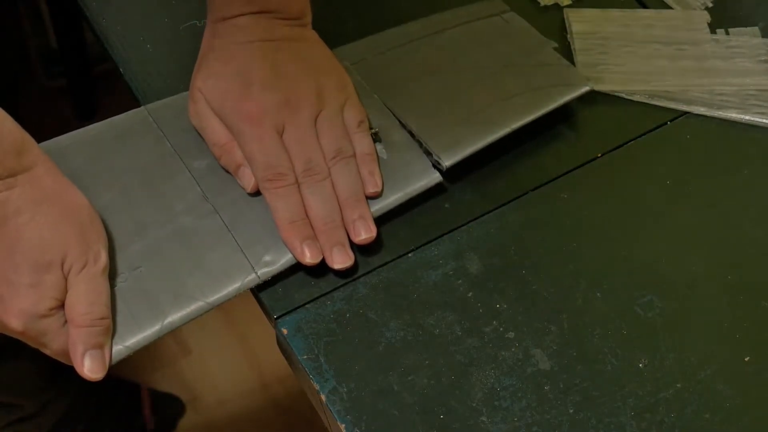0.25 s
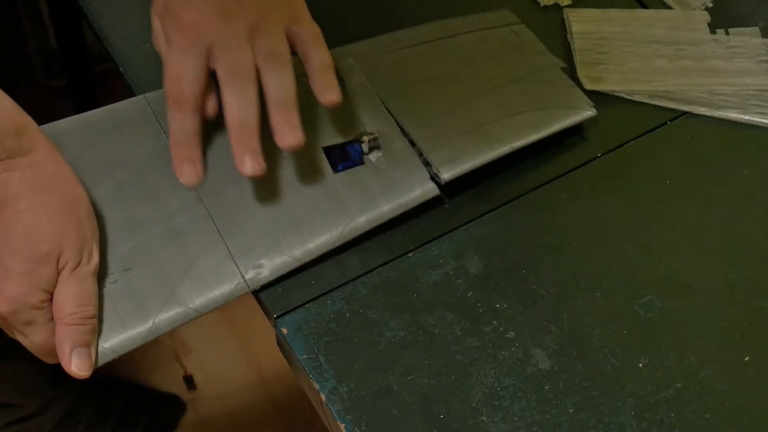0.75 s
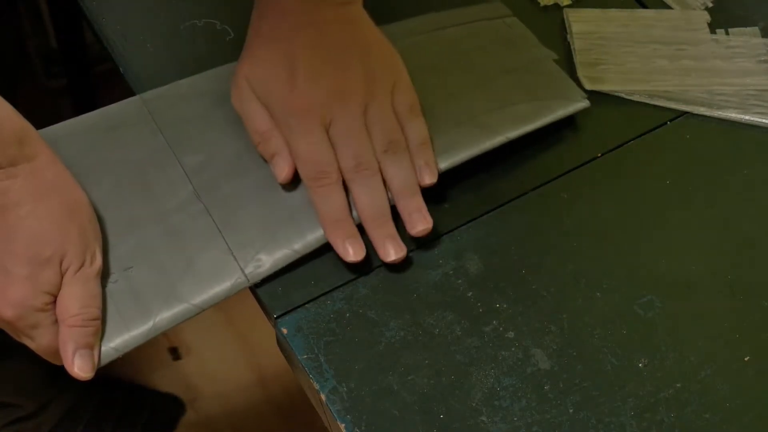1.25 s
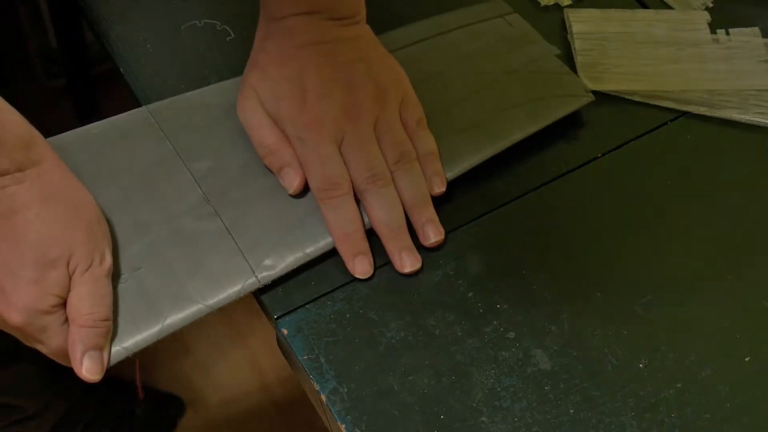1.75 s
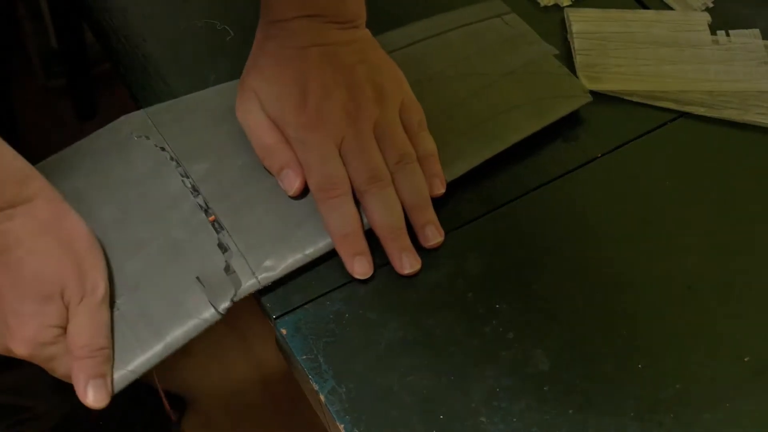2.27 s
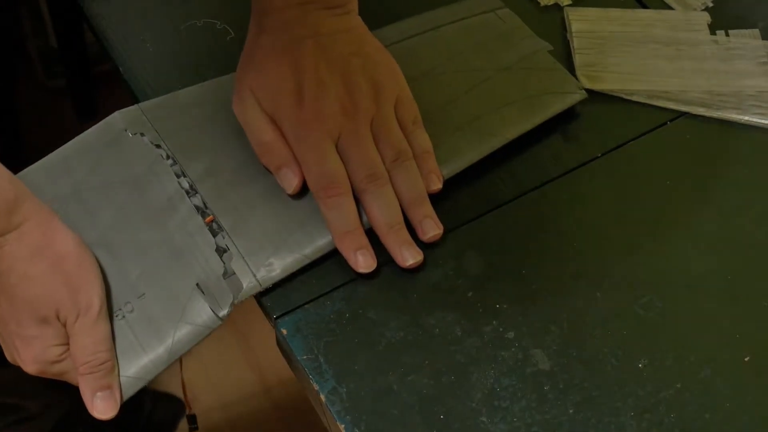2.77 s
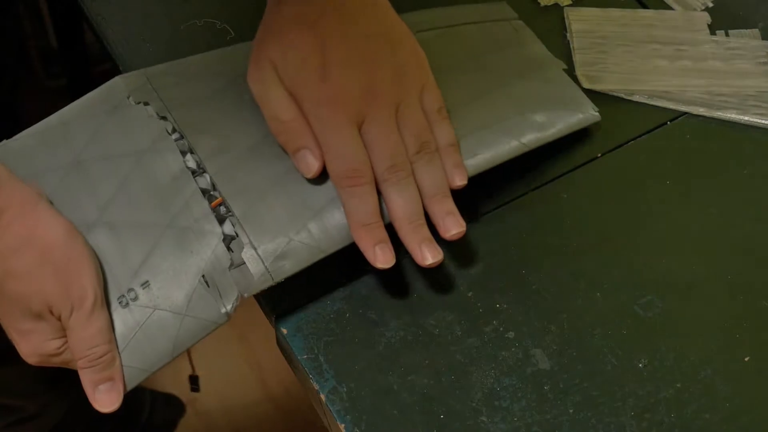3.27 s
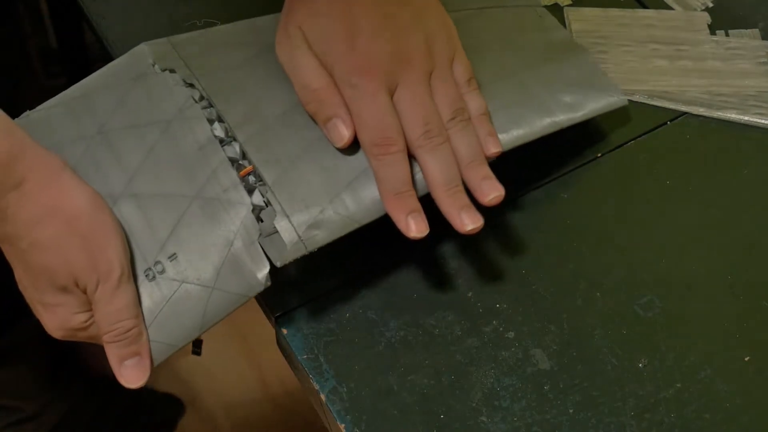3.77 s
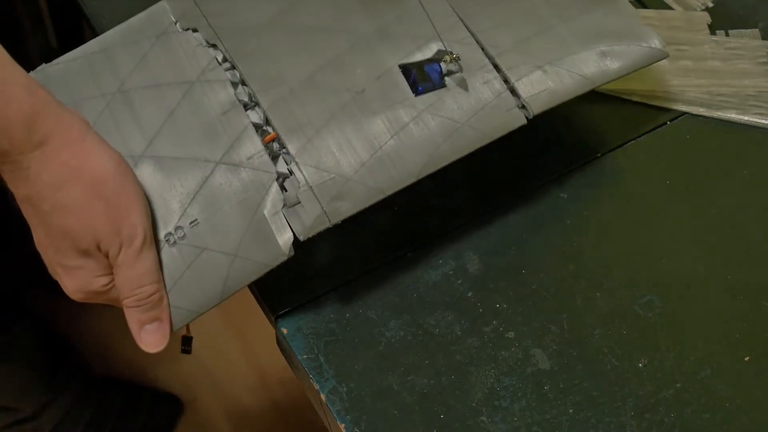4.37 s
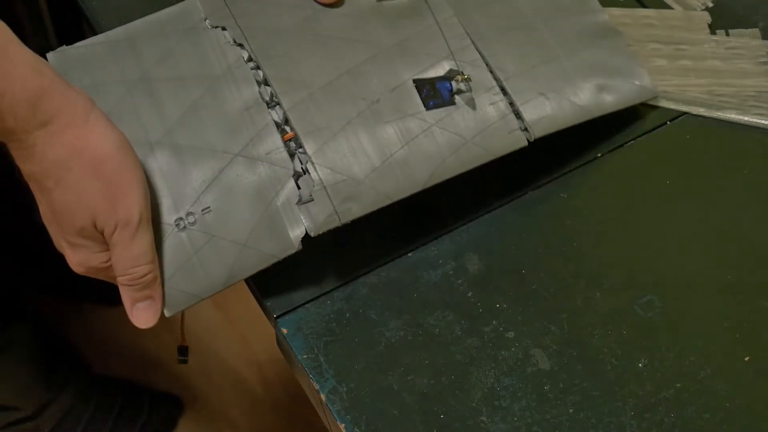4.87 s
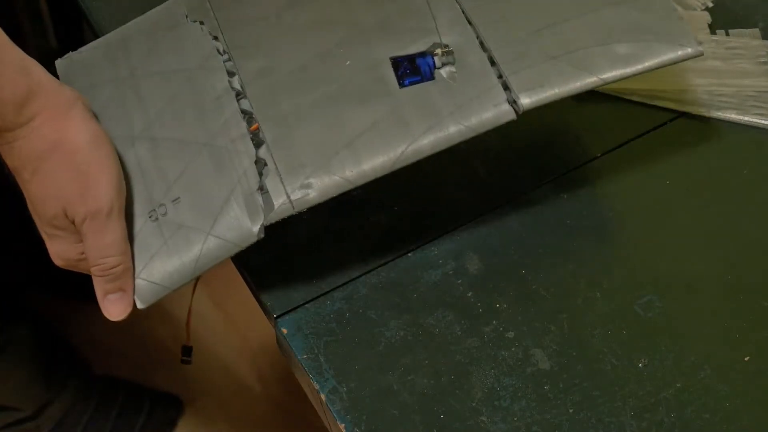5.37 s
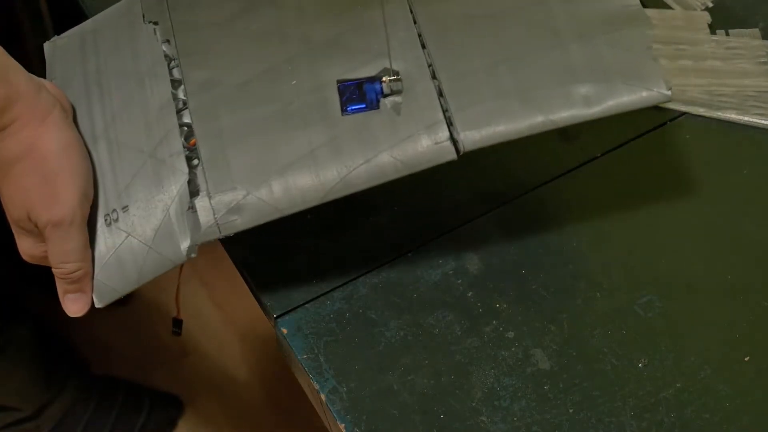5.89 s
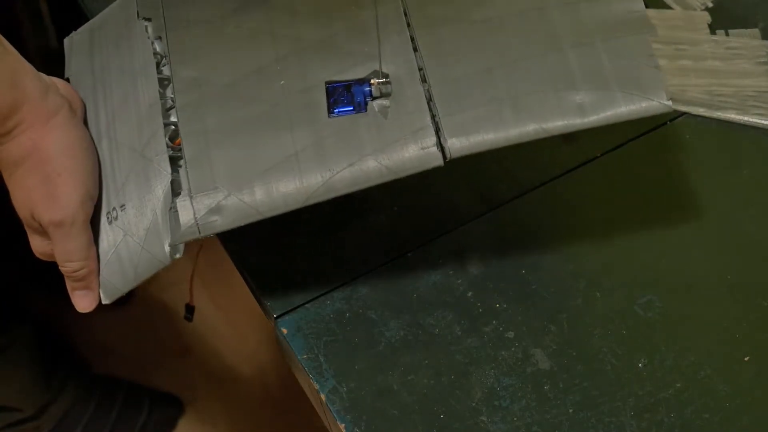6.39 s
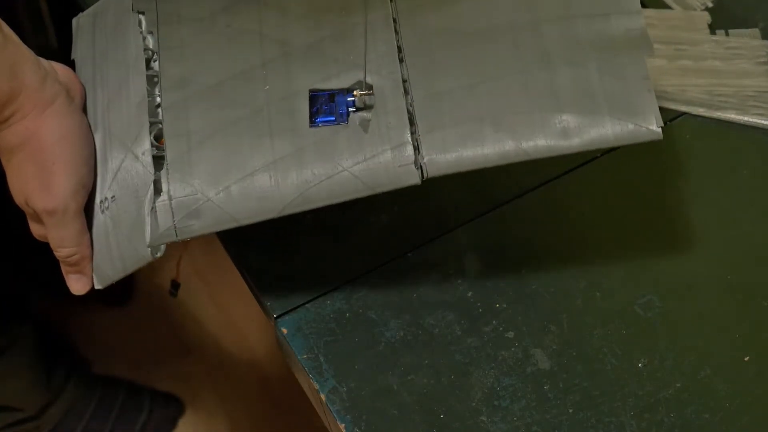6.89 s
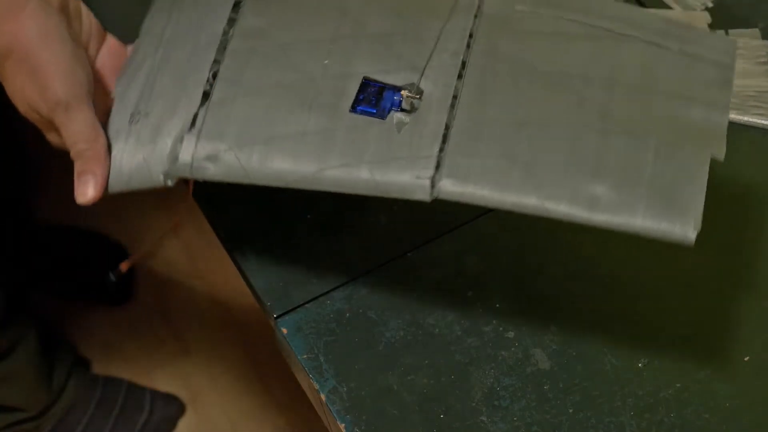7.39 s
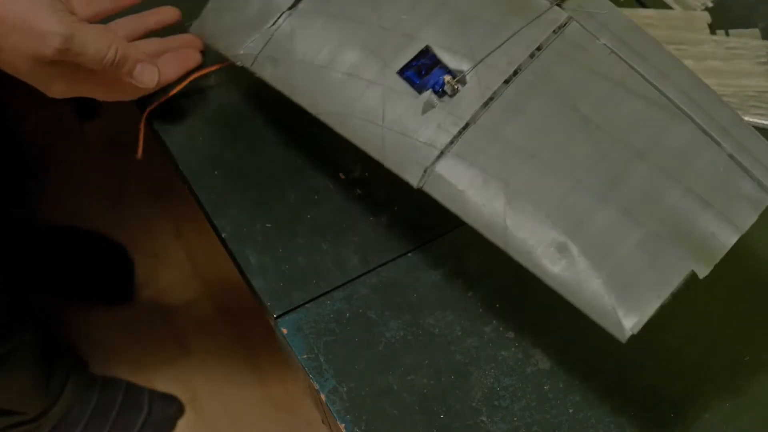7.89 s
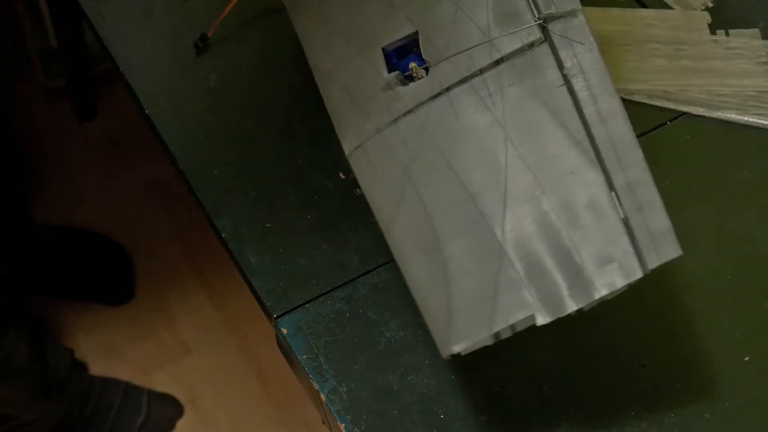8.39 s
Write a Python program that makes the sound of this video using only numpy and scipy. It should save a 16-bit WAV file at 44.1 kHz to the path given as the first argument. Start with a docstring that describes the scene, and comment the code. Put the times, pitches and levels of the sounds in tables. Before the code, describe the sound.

Irregular sharp cracks and splintering crunches of a hollow plastic shell being broken by hand over a workbench, with light rustling between.

```python
"""Cracking a plastic shell

Hands bend a thin, brittle plastic shell over the edge of a workbench until it cracks, then work the
break to and fro. Each fracture radiates a snap and excites the modes of the hollow shell, amid short
pings and rustling tails. Stick-slip friction makes the skin rub and the torn edges squeak once, and
pushes set the bench top thudding. A small hard room reverberates over its own steady hum."""
import sys
import numpy as np
from scipy import signal
from scipy.fft import rfft, irfft
from scipy.io import wavfile
from scipy.ndimage import uniform_filter1d

SR = 44100
rng = np.random.default_rng(int(sys.argv[2]) if len(sys.argv) > 2 else 0)


def to_wav(sig):
    """Store sig (one row per channel, or 1-D mono) as 16-bit WAV at the path in sys.argv[1].

    Samples outside -1..1 are clipped; the rate is SR.
    """
    pcm = np.clip(np.atleast_2d(sig), -1, 1) * 32767
    pcm = np.round(pcm).astype(np.int16)
    wavfile.write(sys.argv[1], SR, pcm.T)  # frames by channels


N = 381465

# Spectrum of the room's hum and hiss: frequency_hz, density_db
HUM_SPECTRUM = [(15, -34), (25, -33), (87, -11), (120, -5.5), (279, -4.5), (347, -4), (455, -10), (494, -5),
                (535, -8.5), (741, -7), (804, -8.5), (2020, -16.5), (6310, -20.5), (14600, -23.5),
                (16300, -25)]
# Reverberation time of the room: frequency_hz, t60_s
ROOM_DECAY = [(150, 0.57), (500, 0.19), (1500, 0.34), (4000, 0.072), (9000, 0.14), (15000, 0.13)]
# Modes of the bench top: frequency_hz, level_db, t60_s
BENCH_MODES = [(64, -6, .55), (120, -6, .4), (200, -9, .25), (260, -8, .38), (318, -8, .13), (377, 1, .19),
               (440, -6, .08)]
# Pushes on the bench (a heavy palm shakes the whole top): start_s, level_db, push_ms, deep_modes_db
BENCH_PUSHES = [(0.546, -54, 2.2, -11), (1.264, -35, 8.6, -0.5), (1.498, -49, 5.7, -11),
                (2.185, -51, 13, -10), (2.6, -50.5, 4.3, -12), (2.644, -40, 5.6, -12),
                (4.905, -51.5, 15, -9)]
# Spectrum of friction on the shell's skin: frequency_hz, density_db
SKIN_SPECTRUM = [(71, -52), (120, -40), (204, -3.5), (341, -9), (630, -0.5), (3450, -4), (9990, -6),
                 (14700, -11), (16000, -20)]
# Swells of rubbing noise and rustling tails after cracks; swell and fade span 20 dB:
# peak_s, level_db, swell_s, fade_s, treble_db
RUSTLE_SWELLS = [(0, -49, .1, 0.3, -26), (0.249, -44.5, 0.013, 0.08, -4), (.428, -47.5, .05, 0.11, -5),
                 (.545, -45, 0.027, 0.74, -8), (.866, -38, 0.26, 0.25, -6.5), (2.45, -41, 0.15, 0.3, -28),
                 (2.649, -43, 0.0072, 0.11, 3), (3.339, -38.5, 0.61, 0.27, -17),
                 (4.504, -52.5, 0.025, 1, -6.5), (5.301, -42, 0.021, 0.61, -20),
                 (5.697, -46, 0.074, 0.016, -26), (7.6, -51, 0.056, 0.85, -17), (7.96, -54, 0.49, 0.77, -9),
                 (8.204, -48, 0.044, 0.2, -2), (8.362, -61.5, 0.017, 0.075, 14)]
# Course of the slip between the torn edges: time_s, level_db, pitch_hz, upper_level_db
SQUEAK_COURSE = [(5.33, -48, 3550, -41), (5.375, -33, 3560, -35.5), (5.396, -16.5, 3587, -32),
                 (5.418, -22.5, 3636, -29), (5.429, -26, 3645, -28.5), (5.437, -16, 3673, -31),
                 (5.45, -20.5, 3730, -30), (5.5, -27, 3565, -37), (5.517, -23, 3564, -41),
                 (5.56, -35.5, 3550, -49), (5.635, -48, 3555, -62), (5.65, -44, 3560, -63),
                 (5.7, -54, 3560, -74)]
# Modes of the slipping edges: pitch_ratio, width_hz, level_db, is_upper
EDGE_MODES = [(1, 240, -4, 0), (1.01, 900, -12, 0), (.86, 500, -8, 1), (1.12, 300, -13, 1),
              (1.64, 320, -1, 1), (1.47, 400, -12, 1), (1.85, 400, -22, 0), (2.01, 320, -16, 0),
              (2.62, 700, -16, 1), (3.0, 1200, -22, 1), (3.95, 400, -27, 1)]
# Short pitched resonances (pings, snaps, shell rings and one low bump):
# start_s, pitch_hz, level_db, t60_s, quality_factor
SHORT_RESONANCES = [(0.208, 155, -43, .25, 2.5), (.686, 2050, -30, 0.074, 6.9), (.955, 627, -35, 0.28, 20),
                    (1.15, 690, -27.5, 0.37, 6.5), (1.149, 1290, -29, 0.18, 8.9),
                    (1.15, 4320, -36, 0.22, 12), (1.15, 5710, -43, 0.25, 17),
                    (1.2215, 6500, -17.5, .012, 1.9), (1.22, 7030, -23, 0.25, 5.7),
                    (1.467, 3960, -26, 0.13, 0.99), (2.1728, 2910, -15, 0.066, 1.4),
                    (2.61, 7360, -29.5, 0.2, 10), (2.649, 627, -23, 0.05, 2), (2.649, 2190, -30, 0.22, 7.5),
                    (2.649, 3200, -38.5, 0.19, 7), (2.891, 2080, -16, 0.11, 2.3),
                    (2.891, 3440, -26, 0.23, 3.7), (2.893, 4560, -29.5, 0.29, 8.6),
                    (3.269, 3450, -41.5, .4, 4.6), (3.25, 930, -37.5, 0.27, 12),
                    (3.458, 740, -16.5, 0.12, 3.2), (3.458, 1260, -32.5, 0.86, 6),
                    (3.6, 770, -39, 0.79, 6.4), (4.042, 2070, -34, 0.1, 4.1), (4.5, 803, -44, 0.46, 5.5),
                    (5.113, 786, -14.5, 0.037, 2.7), (5.13, 774, -40, 2.3, 9),
                    (5.114, 1100, -27.5, 0.58, 5.2), (5.115, 3320, -30, 0.7, 13),
                    (5.701, 2180, -26, 0.16, 2), (6.456, 1626, -35, 0.13, 12), (7.015, 1467, -30, 0.14, 26),
                    (7.015, 1630, -41, .5, 15), (7.113, 1256, -33, 0.23, 26), (7.112, 2260, -33, 0.15, 14),
                    (7.277, 2140, -21.5, 0.23, 5.5), (7.452, 2360, -29, 0.24, 3.3),
                    (7.475, 9800, -37, 0.37, 8.3), (7.518, 2670, -31, 0.32, 1.9)]
# Modes of the hollow shell: frequency_hz, width_hz, level_db
SHELL_MODES = [(772, 45, 1.5), (1253, 42, 0), (1465, 50, -8), (1865, 45, 1), (2298, 60, -9), (2440, 60, -9),
               (3000, 60, 0)]
# Cracks in the shell: start_s, level_db, bass_db, treble_db, splinter_t60_s, ring_db
SHELL_CRACKS = [(0.2467, -40.5, -36, -3, 0.59, -10), (0.391, -54, 2.5, -10, .42, -15),
                (0.4286, -56.5, 7.5, -5, 0.63, -25), (0.5405, -51, 15.5, -20, 0.97, 14),
                (0.6191, -40.5, 0.5, -12, 0.74, -4), (0.6854, -39.5, -24, 1.5, 0.72, -20),
                (1.0398, -47, 1.5, -20, 0.23, 0), (1.1488, -35.5, 4, -13.5, 0.5, -34),
                (1.2198, -33, -40, 12.5, 0.9, -20), (1.263, -36.5, 3.5, -19, 0.99, -23),
                (1.381, -45, -26, 9, .63, -17), (1.4115, -30, -14.5, 0.5, 1, -30),
                (1.4803, -12.5, -6.5, -8.5, 0.73, -3), (1.8315, -47, -18, 12.5, 0.53, -22),
                (2.177, -18, -18, 13, 0.95, 2.5), (2.183, -9, -4.5, -22, 1, -40),
                (2.572, -60, 20, -17, 0.73, -14), (2.608, -46.5, -16, 12, 1, -28),
                (2.6498, -40, 11, -36, 0.71, -33), (2.793, -46.5, -33, 17, 1, -20),
                (2.891, -22, -8, -10.5, 0.64, -10), (3.1034, -28, -19.5, 0.5, 0.46, -28),
                (3.457, -10.5, -16, 1, 1, -9), (3.7379, -42.5, -14.5, 9.5, 0.73, 0),
                (4.0426, -46.5, -3.5, -8.5, 0.61, -10), (4.4924, -66, 3, -7, 1, 24),
                (4.7028, -29.5, -17.5, 10, 0.56, -31), (4.8963, -41.5, 7.5, -11, 0.58, -20),
                (4.912, -38.5, 5, -7.5, 0.56, -22), (4.9498, -34.5, -15, -12, 0.52, -9),
                (5.1123, -12.5, -23, 6, 0.84, -6), (5.7002, -42.5, -11, 0, 0.81, 2.5),
                (6.15, -42.5, -26, 9, 0.55, -6), (6.4534, -34.5, -45, 8, 0.53, 0.5),
                (6.8404, -18.5, -13, -10.5, 0.55, 8), (7.014, -32.5, -4.5, -12, 0.51, 4.5),
                (7.0909, -36, -15, -14, 0.54, 4.5), (7.112, -32.5, -9, -6.5, 0.67, 2.5),
                (7.255, -32, -29, -9, 0.62, -3), (7.2759, -12, -26.5, 1.5, 0.79, -4.5),
                (7.451, -35, -5, -13, 0.8, -8), (7.4735, -31.5, -14, 0, 0.42, -22),
                (7.519, -30, -48, 3, 0.58, -9), (7.559, -35.5, -13, 0, 0.38, -10),
                (7.934, -62.5, -13, 18, 0.33, -2), (8.204, -48, -17, -8, 1, -22),
                (8.351, -43, -43, 13.5, 0.58, -12)]
# Frequency bands of a crack: low_hz, high_hz
CRACK_BANDS = [(2000, 5000), (250, 700), (700, 2000), (5000, 9000), (9000, 15000)]
# How each band follows a crack's colour: offset_db, bass_share, treble_share
CRACK_BAND_COLOUR = [(0, 0.017, 0), (-2.5, 1.235, 0.053), (6.5, 0.72, 0.37), (-0.6, 0.15, 0.59),
                     (6.5, 0.35, 0.83)]
# Splintering time of each band relative to that of the crack: t60_ratio
CRACK_BAND_DECAY = [0.72, 0.81, 0.72, 0.76, 0.31]


def undb(db):
    """Amplitude ratio of a level in decibels."""
    return 10 ** (np.asarray(db) / 20)


def unit(x):
    """Normalisation to an rms of one."""
    return x / np.sqrt(np.mean(x ** 2))


def decay(t, t60_s):
    """Exponential damping by 60 dB in t60_s."""
    return 1000. ** (-t / t60_s)


def band(x, low_hz, high_hz):
    """Causal Butterworth band-pass."""
    sos = signal.butter(2, [low_hz, min(high_hz, .45 * SR)], "band", fs=SR, output="sos")
    return signal.sosfilt(sos, x)


def resonate(x, hz, width_hz):
    """Forced response of one damped resonator."""
    return signal.lfilter(*signal.iirpeak(hz, hz / width_hz, SR), x)


def coloured(x, spectrum):
    """Spectral shaping by a curve of levels over log frequency."""
    hz, db = np.transpose(spectrum)
    bins_hz = np.maximum(np.arange(N // 2 + 1) * SR / N, 1)
    return irfft(rfft(x) * undb(np.interp(np.log(bins_hz), np.log(hz), db)), N)


def waver(rate_hz):
    """Smooth random fluctuation: values held for 1 / rate_hz and averaged twice."""
    hold = int(SR / rate_hz)
    steps = np.repeat(rng.standard_normal(N // hold + 1), hold)
    return uniform_filter1d(uniform_filter1d(steps, hold), hold)[:N]


def grains(size, max_db):
    """Granular noise: Gaussian samples with exponentially distributed boosts in level."""
    return rng.standard_normal(size) * undb(np.minimum(3 * rng.exponential(size=size), max_db))


def stereo(mid, side, side_db):
    """Left and right as the sum and difference of mid and side."""
    return mid + undb(side_db) * side * np.array([[1], [-1]])


def room_hum(level_db=-52.5):
    """Background noise: hum and hiss of fixed spectrum, wavering slightly in level."""
    mid, side = (unit(coloured(rng.standard_normal(N), HUM_SPECTRUM)) for _ in range(2))
    return undb(level_db + 0.5 * waver(1)) * stereo(mid, side, side_db=-3.5)


def reverberation(x, level_db=-9, build_up_s=0.0025):
    """Diffuse field: dense reflections build up, then decay at their own rate in each half octave."""
    t = np.arange(SR) / SR
    hz, t60_s = np.transpose(ROOM_DECAY)
    tail = np.zeros((2, SR))
    for low_hz in 60 * 2 ** np.arange(0, 8.5, .5):
        fade = decay(t, np.interp(np.log(low_hz), np.log(hz), t60_s))
        tail += band(rng.standard_normal((2, SR)), low_hz, low_hz * np.sqrt(2)) * fade
    tail *= (1 - np.exp(-t / build_up_s)) / np.sqrt(np.sum(tail[0] ** 2))
    mid, side = signal.fftconvolve(tail, x[None])[:, :N]
    side = side + band(side, 8900, 14800)  # the treble arrives more from the sides
    return undb(level_db) * stereo(mid, side, side_db=-4.5)


def bench_thuds(spread_db=2.2, deep_below_hz=180):
    """Modal response: a soft push of hand or shell is convolved with the bench top's damped modes."""
    t = np.arange(SR) / SR
    out = np.zeros(N + 2 * SR)
    for start_s, level_db, push_ms, deep_db in BENCH_PUSHES:
        shares = undb(spread_db * rng.standard_normal(len(BENCH_MODES)))
        ring = 0
        for share, (hz, mode_db, t60_s) in zip(shares, BENCH_MODES):
            gain = share * undb(mode_db + deep_db * (hz < deep_below_hz))
            ring += gain * np.sin(2 * np.pi * hz * t) * decay(t, t60_s)
        # the palm lands unevenly: a rough press that swells and eases off
        progress = t[:2048] * 1000 / min(push_ms, 12)
        push = band(rng.standard_normal(len(progress)), 77, 860) * progress * np.exp(-progress)
        thud = signal.fftconvolve(ring, push / np.sqrt(np.sum(push ** 2)))
        start = int(start_s * SR)
        out[start:start + len(thud)] += undb(level_db) * thud
    return out[:N]


def rub_and_rustle(ring_db=-25):
    """Stick-slip grains swell and fade as rubs or crack tails, and ring the lowest shell mode."""
    t = np.arange(N) / SR
    friction = undb(3 * waver(90)) * grains(N, max_db=12)
    skin = coloured(friction, SKIN_SPECTRUM)
    skin /= np.std(band(skin, 700, 3000))
    treble = signal.sosfilt(signal.butter(1, 3000, "high", fs=SR, output="sos"), skin)
    body_power = treble_power = 0
    for peak_s, level_db, swell_s, fade_s, treble_db in RUSTLE_SWELLS:
        envelope = undb(level_db - 20 * np.maximum((peak_s - t) / swell_s, (t - peak_s) / fade_s))
        body_power += envelope ** 2
        treble_power += (undb(treble_db) * envelope) ** 2
    hz, width_hz, _ = SHELL_MODES[0]
    body = skin - treble + undb(ring_db) * unit(resonate(friction, hz, width_hz))
    return np.sqrt(body_power) * body + np.sqrt(treble_power) * treble


def edge_squeak(tone_db=-4.5, pitch_waver=.004):
    """Friction oscillation: edges slip in jerks; a clear tone and rough modes follow the tension."""
    times_s, *columns = np.transpose(SQUEAK_COURSE)
    start, end = int(times_s[0] * SR), int(times_s[-1] * SR)
    t = np.arange(start, end) / SR
    level_db, pitch_hz, upper_db = (np.interp(t, times_s, column) for column in columns)
    phase = 2 * np.pi * np.cumsum(pitch_hz * (1 + pitch_waver * waver(60)[start:end])) / SR
    sound = undb(tone_db + level_db) * np.sqrt(2) * np.sin(phase)
    for ratio, width_hz, mode_db, is_upper in EDGE_MODES:
        lowpass = signal.butter(2, width_hz / 2, fs=SR, output="sos")
        wobble = signal.sosfilt(lowpass, rng.standard_normal(len(t)) + 1j * rng.standard_normal(len(t)))
        mode = unit((wobble * np.exp(1j * ratio * phase)).real)  # a narrow band of noise
        sound += undb(mode_db + (upper_db if is_upper else level_db)) * mode
    jerks = undb(2.2 * waver(130)[start:end])
    return np.pad(sound * jerks, (start, N - end))


def short_resonances(rise_s=0.000172):
    """Damped resonance: noise filtered about one frequency sets in sharply and dies away."""
    t = np.arange(SR * 2 // 3) / SR
    out = np.zeros(N + len(t))
    for start_s, hz, level_db, t60_s, quality in SHORT_RESONANCES:
        width_hz = hz / np.clip(quality, 1.5, 24)
        noise = rng.standard_normal(len(t))
        ring = unit(resonate(resonate(noise, hz, width_hz), hz, width_hz))
        envelope = (1 - np.exp(-t / rise_s)) * decay(t, t60_s)
        start = int(start_s * SR)
        out[start:start + len(t)] += undb(level_db) * ring * envelope
    return out[:N]


def shell_ring(force, spread_db=2.2):
    """Modal coupling: each crack lies somewhere else, so it drives the shell's modes in other shares."""
    shares = undb(spread_db * rng.standard_normal(len(SHELL_MODES)))
    drive = band(force, 600, 4000)
    return sum(share * undb(mode_db) * resonate(drive, hz, width_hz)
               for share, (hz, width_hz, mode_db) in zip(shares, SHELL_MODES))


def shell_cracks(full_scale_rise_s=0.00039, snap_to_rise=13.6, top_band_hz=9000):
    """Brittle fracture: a snap of tiny breaks, then softer splintering, radiates and rings the shell."""
    t = np.arange(24576) / SR
    out = np.zeros(N + len(t))
    bands = list(zip(CRACK_BANDS, CRACK_BAND_COLOUR, CRACK_BAND_DECAY))
    for start_s, level_db, bass_db, treble_db, t60_s, ring_db in SHELL_CRACKS:
        # weak cracks set in more gently, and splintering is a larger part of them
        rise_s = full_scale_rise_s * undb(-0.21 * level_db)
        splinter_gain = undb(min(-19.5 - 0.46 * level_db, -5))
        onset = 1 - np.exp(-t / rise_s)
        direct = force = 0
        for (low_hz, high_hz), (offset_db, bass_share, treble_share), t60_ratio in bands:
            snap = np.exp(-t / (snap_to_rise * np.sqrt(t60_ratio) * rise_s))
            splinters = splinter_gain * decay(t, t60_ratio * t60_s)
            fractures = unit(grains(len(t), max_db=15)) * (snap + splinters) * onset
            bandwidth_gain = np.sqrt(SR / 2 / (high_hz - low_hz))
            part = bandwidth_gain * band(fractures, low_hz, high_hz)
            colour_db = offset_db + bass_share * bass_db + treble_share * treble_db
            if low_hz == top_band_hz:
                colour_db += 0.059 * level_db  # the highest band is softer in quiet cracks
            direct += undb(colour_db) * part
            force += part
        start = int(start_s * SR)
        out[start:start + len(t)] += undb(level_db) * (direct + undb(ring_db) * shell_ring(force))
    return out[:N]


def scene():
    """Superposition of the direct sound, a touch to the left, its reverberation and the room's hum."""
    direct = shell_cracks() + short_resonances() + rub_and_rustle() + edge_squeak() + bench_thuds()
    return direct * undb([[.3], [-.3]]) + reverberation(direct) + room_hum()


def record(dry):
    """Microphone response: a limited band, a dip near the port resonance and clipping at full scale."""
    x = band(dry, 75, 11300)
    x = np.clip(x - 0.46 * resonate(x, hz=7940, width_hz=1060), -1, 1)
    return signal.sosfilt(signal.ellip(8, .2, 70, 15900, fs=SR, output="sos"), x)


dry = scene()
out = record(dry)
to_wav(out)
```